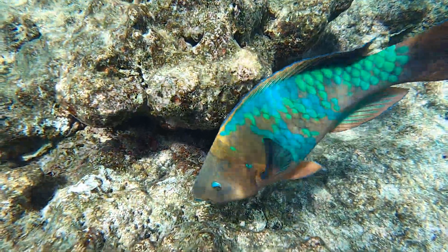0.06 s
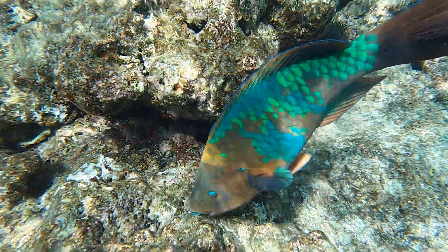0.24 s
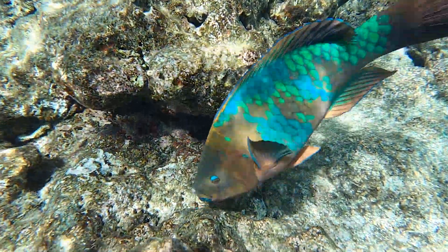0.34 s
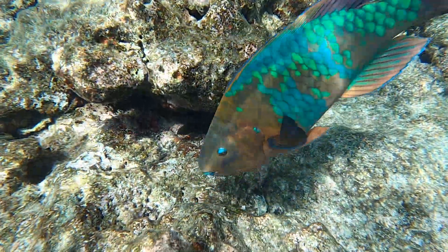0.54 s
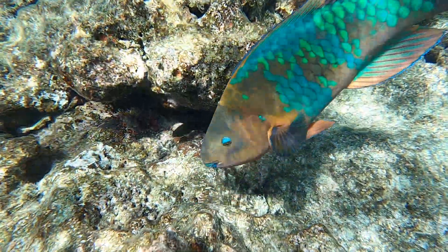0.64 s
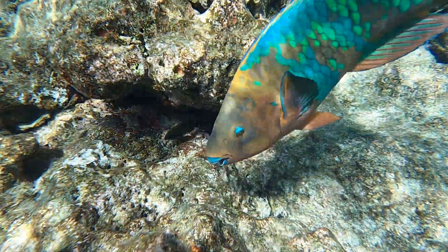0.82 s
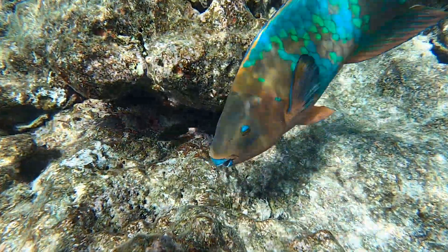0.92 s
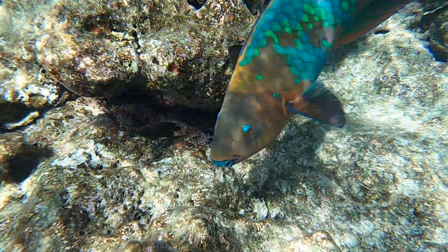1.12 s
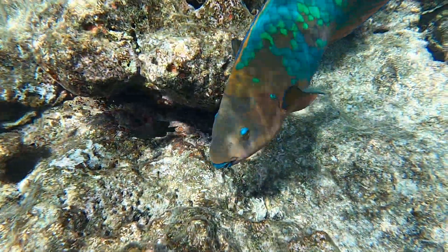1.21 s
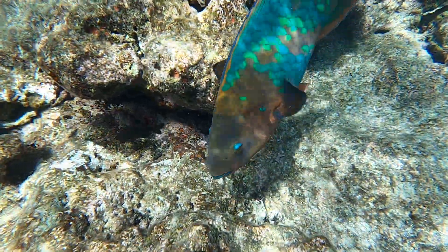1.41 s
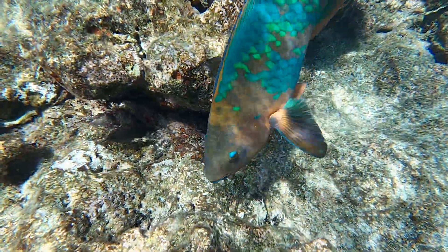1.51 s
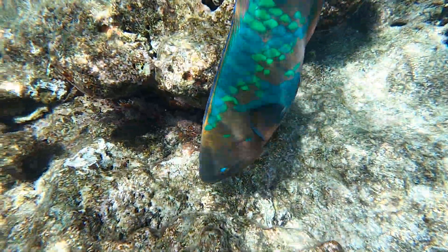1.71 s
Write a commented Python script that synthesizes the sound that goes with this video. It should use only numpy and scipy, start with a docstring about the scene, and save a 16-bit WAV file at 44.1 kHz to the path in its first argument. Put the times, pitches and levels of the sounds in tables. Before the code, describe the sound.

A fish bites rock with one sharp click amid underwater rumble, gurgles and crackling.

```python
"""Fish biting on a reef

Under water, a fish bites at algae on a rock: its beak gives a few faint rasps and one sharp click.
Flow rumbles past the housing and twice gurgles against it; small bubbles and two short knocks ring.
All around, the reef crackles with tiny snaps, filtered by the housing differently on each side."""
import sys
import numpy as np
from scipy import signal
from scipy.fft import rfft, irfft, next_fast_len
from scipy.io import wavfile
from scipy.ndimage import uniform_filter1d

SR = 44100
rng = np.random.default_rng(int(sys.argv[2]) if len(sys.argv) > 2 else 0)


def to_wav(s):
    """Save 16-bit WAV."""
    ch = np.atleast_2d(s).T  # columns
    pcm = np.round(np.clip(ch, -1, 1) * 32767)  # PCM
    wavfile.write(sys.argv[1], SR, pcm.astype(np.int16))


N = 77175
T = np.arange(N) / SR
TOP_HZ = 14300


def undb(db):
    return 10 ** (np.asarray(db) / 20)


def unit(x):
    return x / np.sqrt(np.mean(x ** 2) + 1e-18)


def pan(x, db):
    """Level difference between the channels: db is left minus right."""
    return x * undb(np.array([[db], [-db]]) / 2)


def smooth(x, seconds):
    """Two moving averages in series form a low-pass filter."""
    size = max(int(seconds * SR), 2)
    return uniform_filter1d(uniform_filter1d(x, size), size)


def even(x, seconds):
    """Division by the running RMS holds a texture at unit level."""
    return x / np.sqrt(np.abs(smooth(x ** 2, seconds)) + 1e-12)


def burst(x, size=176):
    """Energy normalisation: a transient gets the energy of 4 ms at unit level."""
    return x / np.sqrt(np.sum(x ** 2, axis=-1, keepdims=True) / size)


def colour(x, points, size=4096):
    """Minimum-phase filter through (f/Hz, gain/dB) points, falling 10 dB an octave above the last."""
    hz, db = np.array(points, float).T
    n = 2 * next_fast_len((x.shape[-1] + size) // 2)
    f = np.maximum(np.arange(n // 2 + 1) * SR / n, 1)
    gain_db = np.interp(np.log(f), np.log(hz), db) - 10 * np.log2(np.maximum(f / hz[-1], 1))
    cepstrum = irfft(np.log(undb(gain_db)))
    cepstrum[1:n // 2] *= 2
    cepstrum[n // 2 + 1:] = 0
    return irfft(rfft(x, n) * np.exp(rfft(cepstrum)))[..., :x.shape[-1]]


def peak(f, centre_hz, height_db, octaves):
    """Spectral peak in dB, Gaussian in log frequency."""
    return height_db * np.exp(-(np.log2(f / centre_hz) / octaves) ** 2 / 2)


def add(out, start_s, x):
    """Superpose x on out from a given time."""
    i = int(np.clip(start_s * SR, 0, N - 1))
    out[..., i:i + x.shape[-1]] += x[..., :N - i]


# Frequency response of the housing on each side: f/Hz, gain/dB
HOUSING_LEFT = [(300,-8.5),(850,-14),(1200,-5),(1400,-7),(1700,4.5),(2000,-9.5),(2450,-1.5),(4000,1),(5100,-2.5),(5900,-21.5),(7100,-8),(8400,-27),(12000,-32)]
HOUSING_RIGHT = [(300,4.5),(850,-15),(1200,-11.5),(1700,-1.5),(2000,-4.5),(2450,-14),(2700,4),(3100,-5),(4000,2.5),(4900,1.5),(8000,-30),(12500,-40.5)]
def housing(left, right):
    """Resonances of the housing filter the sound differently on each side."""
    return np.array([colour(left, HOUSING_LEFT), colour(right, HOUSING_RIGHT)])


# Envelopes of rumble and wash: t/s, relative level/dB
RUMBLE_LEVEL = [(0.0, -33), (0.452, -25.5), (0.485, -46.5), (0.544, -25.5), (0.57, -38.5), (0.652, -26),
                (0.809, -50.5), (0.843, -31.5), (0.93, -30), (1.257, -32.5), (1.286, -26), (1.408, -36),
                (1.7, -29), (1.75, -33)]
WASH_LEVEL = [(.12,-46.5),(.3,-55.5),(.95,-51),(1.15,-55),(1.45,-56.5),(1.75,-51)]
# Their spectra: f/Hz, relative density/dB
RUMBLE_SPECTRUM = [(12,-37.5),(24,-4),(33,2),(44,0),(58,-13.5),(85,-23),(200,-51.5)]
WASH_SPECTRUM = [(50,-10.5),(115,0),(190,-10),(340,-10.5),(560,-17.5),(780,-33),(1200,-26),(2500,-47)]
def flow(wander_db=2.5):
    """Slow pressure fluctuations of water on the housing make a rumble, over a soft wash."""
    rumble = even(colour(rng.standard_normal(N + SR), RUMBLE_SPECTRUM)[SR:], seconds=0.085)
    rumble *= undb(np.interp(T, *np.array(RUMBLE_LEVEL).T) + 1)
    common = unit(colour(rng.standard_normal(N), WASH_SPECTRUM))
    diffuse = undb(-15.5) * unit(colour(rng.standard_normal((2, N)), WASH_SPECTRUM))
    wander = unit(smooth(rng.standard_normal(N), seconds=0.049))
    wash_db = np.interp(T, *np.array(WASH_LEVEL).T) + wander_db * wander
    return pan(rumble, -3) + pan((common + diffuse) * undb(wash_db), 1.8)


def snap_envelope(t, decay_s, scatter_s=0.012):
    """Two exponential decays: the direct crack and its weaker scattering off the rocks."""
    return np.exp(-t / decay_s) + undb(-15.5) * np.exp(-t / scatter_s)


# Spectra of the distant patter and hiss: f/Hz, relative density/dB
PATTER_SPECTRUM = [(1150,-14.5),(1500,0.5),(5000,-1),(9000,3.5)]
HISS_SPECTRUM = [(1000,-14.5),(1600,-3.5),(5000,-6.5),(9000,-0.5)]
def far_snaps(count=190, low_hz=1620, high_hz=7380, spread_db=13.5, size=2048):
    """Incoherent summation: weak snaps, each with its own pitch and side, merge into hiss."""
    patter, f = np.zeros((2, N)), np.geomspace(500, TOP_HZ, 40)
    envelope = snap_envelope(T[:size], decay_s=0.0013)
    for when, pitch, strength, side in rng.random((count, 4)):
        hz = low_hz * (high_hz / low_hz) ** pitch
        spectrum = np.column_stack([f, peak(f, hz, height_db=12, octaves=0.35)])
        grit = rng.standard_normal(size) + rng.standard_normal((2, size))
        snap = burst(colour(grit * envelope, spectrum, size=size)) * undb(spread_db * strength)
        add(patter, when * N / SR, pan(snap, 8 * (2 * side - 1)))
    patter = unit(housing(*colour(patter, PATTER_SPECTRUM)))
    noise = rng.standard_normal(N) + 0.5 * rng.standard_normal((2, N))
    hiss = unit(housing(*colour(noise, HISS_SPECTRUM)))
    return patter * undb(-55.5) + hiss * undb(-59.5)


def clicks(per_s, spread_db):
    """A Poisson train of impulses with random size and sign."""
    chance, size = rng.random(N), np.clip(rng.standard_normal(N), -2, 2)
    return (chance < per_s / SR) * undb(spread_db * size) * rng.choice([-1, 1], N)


# Strokes of the beak: t/s, duration/s, level/dB
RASP_STROKES = [(0.018,0.027,-46),(0.092,0.0089,-49.5),(0.121,0.043,-45),(0.775,0.013,-38.5),(0.959,0.035,-47),(1.628,0.011,-39.5)]
# Their spectrum: f/Hz, relative density/dB
RASP_SPECTRUM = [(500,-6.5),(800,-13.5),(1020,-1.5),(1230,-11.5),(1470,6),(1750,-5.5),(2200,-18),(3100,-10),(5000,-33)]
def rasps():
    """Friction: the beak drags over the rock in short strokes, each a train of tiny impacts."""
    push = sum(undb(db) * np.sin(np.pi * np.clip((T - s) / length, 0, 1))
               for s, length, db in RASP_STROKES)
    grit = even(colour(clicks(per_s=1500, spread_db=0.68), RASP_SPECTRUM), seconds=0.0034)
    return pan(grit * push, 6.5)


def snap_band(spectrum, decay_s, size=2048):
    """Source and filter: one band of a snap is decaying noise passed through the housing."""
    noise = rng.choice([-1., 1.], size) * snap_envelope(T[:size], decay_s)
    band = colour(noise, spectrum)
    return burst(housing(band, band))


# Snaps: t/s, relative crack level/dB, peak f/Hz, body level/dB, crack left minus right/dB
NEAR_SNAPS = [(0.135,-40.5,3230,-48,5), (0.198,-48,3100,-54,4), (0.2256,-32,3300,-50.5,3),
              (.2492,-34.5,3740,-44.5,0), (0.2719,-35.5,2600,-47,3), (0.2884,-38.5,2600,-46,0),
              (0.2986,-33,3460,-52,1), (0.3527,-39.5,3400,-59,-1), (0.5608,-47.5,2780,-47,-3),
              (.641,-39,4100,-73,-4), (.6932,-40,3740,-42,6), (0.7085,-41,4330,-72,-1),
              (0.7304,-37,3760,-58,-1), (0.8276,-42,2730,-45.5,12), (0.8753,-37,3120,-40.5,6),
              (0.9507,-37.5,4000,-45.5,-3), (.9903,-36,3380,-46,2), (1.0934,-38.5,2900,-52,7),
              (1.1254,-41.5,2690,-45.5,-9), (1.148,-37.5,3000,-50.5,9), (1.18,-22.5,4600,-42,-3),
              (1.1882,-36,5130,-45,-11), (1.2311,-35,3900,-47.5,2), (1.3022,-35.5,2870,-52.5,6),
              (1.3412,-37.5,4420,-69,-9), (1.3531,-42,2670,-41.5,1), (1.421,-40,3000,-45,6),
              (1.4549,-31,3100,-35,-11), (1.476,-32,5040,-59,-7), (1.499,-34,3070,-56.5,3),
              (1.6413,-37,2630,-40,-7), (1.69,-36.5,3100,-46.5,-1), (1.7147,-30.5,4030,-52.5,0)]
# Spectra of a snap's three bands: f/Hz, relative density/dB
CRACK_SPECTRUM = [(1200,-35),(2500,1.5),(5300,4),(6500,-18.5)]
BODY_SPECTRUM = [(500,-11),(1000,-7.5),(2000,-2),(2600,-8)]
TOP_SPECTRUM = [(3500,-42),(6800,10.5),(12000,0),(14500,9.5)]
def near_snaps():
    """Broadband transients, probably shrimp: a pitched crack, a lower, longer body and a brief top."""
    out, f = np.zeros((2, N)), np.geomspace(1000, 7000, 60)
    base_db = np.interp(f, *np.array(CRACK_SPECTRUM).T)
    for s, crack_db, hz, body_db, side_db in NEAR_SNAPS:
        spectrum = np.column_stack([f, base_db + peak(f, hz, height_db=8.5, octaves=0.14)])
        crack = snap_band(spectrum, decay_s=0.0015) * undb(crack_db - 6.5)
        body = snap_band(BODY_SPECTRUM, decay_s=0.0058) * undb(body_db)
        top = snap_band(TOP_SPECTRUM, decay_s=0.0017) * undb(crack_db - 23.5 + rng.uniform(-7, 7))
        add(out, s, pan(crack, side_db) + pan(body, 5.5) + pan(top, 3))
    return out


# Bubbles, the gurgles' strongest glugs and two short ringing knocks:
# t/s, f/Hz, peak level/dB, rise/s, decay constant/s
BUBBLES_AND_KNOCKS = [(.185,300,-34,0.0018,0.0025),(.238,525,-47,0.0035,0.015),
                      (.372,300,-19,.0016,.004),(.401,590,-12,0.0022,0.0032),(.4055,420,-11.5,.0012,.0025),(.416,260,-18,.002,.004),(.4245,610,-11,0.0018,0.0022),(.429,127,-11.5,0.004,.012),(.4405,350,-17,.0012,.002),
                      (0.4915,496,-30.5,0.00068,0.0026),(.562,490,-41,0.0011,0.0027),(.766,282,-31.5,0.0016,0.0029),(.778,350,-26,0.0015,0.0017),(.778,997,-42,.0008,.004),
                      (.868,594,-32,0.0013,0.017),(0.8755,1730,-30,0.0012,0.003),(.8757,2030,-31,.001,.003),
                      (1.5475,620,-33,.0012,.002),(1.559,215,-25.5,.004,.014),(1.586,600,-30,.0012,.0022)]
def bubbles_and_knocks(glide_per_s=0.11, size=8192):
    """Damped oscillation: each bubble, glug or knock swells, rings and rises slightly in pitch."""
    out, t = np.zeros(N), T[:size]
    for s, hz, db, rise, decay in BUBBLES_AND_KNOCKS:
        envelope = (1 - np.exp(-(t / rise) ** 2)) * np.exp(-t / decay)
        tone = np.sin(2 * np.pi * hz * t * (1 + glide_per_s * t / 2))
        add(out, s, undb(db) * envelope / envelope.max() * tone)
    return pan(out, 2.5)


def churn(low_hz, high_hz, decay_cycles=2.03, size=2048):
    """Heavily damped resonance: a crowd of air pockets, each decaying in about two cycles."""
    out, t = np.zeros(N), T[:size]
    for when, pitch, strength in rng.random((N // 50, 3)):
        hz = low_hz * (high_hz / low_hz) ** pitch
        ring = np.sin(2 * np.pi * hz * t) * np.exp(-t * hz / decay_cycles)
        add(out, when * N / SR, strength ** 2 * np.sqrt(hz) * ring)
    return out


def swell(s, db, fade_s=0.003):
    """Amplitude envelope along a level curve, with Gaussian fades beyond its ends."""
    outside_s = T - np.clip(T, s[0], s[-1])
    return undb(np.interp(T, s, db)) * np.exp(-(outside_s / fade_s) ** 2)


# Envelopes, one table a gurgle: t/s, then relative level/dB of gulps, glugs and fizz
GURGLE_LEVELS = [
    [(.352,-46,-58,-72),(.374,-21,-27,-49),(.397,-22,-27,-44),(.407,-22,-19,-42),(.416,-20,-24,-45),(.427,-19,-21,-37),(.442,-17,-24,-45),(.449,-22,-42,-64),(.467,-40,-53,-72)],
    [(1.535,-46,-60,-68),(1.549,-34,-43,-55),(1.572,-27,-31,-43),(1.589,-25,-35,-49),(1.599,-34,-48,-62),(1.612,-46,-62,-70)],
]
# Spectra of the three layers: f/Hz, gain/dB
GULP_SPECTRUM = [(30,-17.5),(75,-6),(125,-2.5),(170,-6.5),(280,-5),(450,-43)]
GLUG_SPECTRUM = [(140,-32),(260,-0.5),(370,2.5),(590,-2),(720,-6),(850,-25),(1200,-51)]
FIZZ_SPECTRUM = [(550,-3.5),(780,2),(920,-1.5),(1060,3.5),(1250,-8.5),(1500,-3.5),(2200,-15.5),(3500,-10),(5000,-9.5),(6200,-24.5),(7300,-23),(9500,-42.5),(13500,-40)]
def gurgles(fizz_cutoffs_hz=(13000, 1880)):
    """Air pockets resonate as water slops on the housing: deep gulps, quicker glugs, a little fizz."""
    gulps = even(colour(churn(low_hz=81, high_hz=251), GULP_SPECTRUM), seconds=0.017) * undb(1)
    glugs = even(colour(churn(low_hz=263, high_hz=853), GLUG_SPECTRUM), seconds=0.0054)
    fizz = unit(colour(clicks(per_s=3000, spread_db=5.5), FIZZ_SPECTRUM)) * undb(4.5)
    out = np.zeros((2, N))
    for table, cutoff_hz in zip(GURGLE_LEVELS, fizz_cutoffs_hz):
        s, gulp_db, glug_db, fizz_db = np.array(table).T
        out += pan(gulps * swell(s, gulp_db), 0.97)
        out += pan(glugs * swell(s, glug_db), 2.0)
        out += pan(colour(fizz, [(1, 0), (cutoff_hz, 0)]) * swell(s, fizz_db), 5.4)
    return out


# Modes of the beak's click: f/Hz, relative level/dB, T60/s, left minus right/dB
BITE_MODES = [(1500,-19,0.02,3),(2640,-3,0.014,2),(3290,-8,0.014,-1),(3850,-2,0.006,4),(4400,0,0.006,3),(4800,-2,.006,-9),(5200,-5,0.007,-12),(7200,-9.5,0.007,6),(8700,-16,0.0051,5),(9600,-17,0.0046,4),(12200,-25,.005,10)]
def bite(start_s=0.4912, rise_s=0.0007, tail_s=0.0045, size=4096):
    """The impact of beak on rock excites damped modes; scattering adds a short tail."""
    out, ring, t = np.zeros((2, N)), np.zeros((2, size)), T[:size]
    for hz, db, t60, side_db in BITE_MODES:
        cycles = hz * t + rng.random((2, 1)) / 4
        ring += pan(np.sin(2 * np.pi * cycles) * undb(db - 60 * t / t60), side_db)
    ring *= 1 - np.exp(-(t / rise_s) ** 2)
    tail = housing(*(rng.standard_normal((2, size)) * np.exp(-t / tail_s)))
    click = burst(ring) + undb(-12.5) * burst(tail)
    add(out, start_s, pan(click * undb(-29), -0.5))
    return out


def scene():
    """Linear superposition of water, fish and reef."""
    return flow() + gurgles() + bubbles_and_knocks() + bite() + rasps() + near_snaps() + far_snaps()


def record(dry, lag_s=0.00007, lag_fade_hz=(5560, 7950)):
    """Phase delay makes the left channel lag, except in the treble; a low-pass filter cuts the top."""
    n = next_fast_len(N + SR // 2)
    f = np.arange(n // 2 + 1) * SR / n
    lag = lag_s * np.interp(f, lag_fade_hz, (1, 0))
    left = irfft(rfft(dry[0], n) * np.exp(-2j * np.pi * f * lag), n)[:N]
    lowpass = signal.ellip(8, 0.2, 70, TOP_HZ, fs=SR, output="sos")
    return signal.sosfilt(lowpass, np.array([left, dry[1]]))


dry = scene()
out = record(dry)
to_wav(out)
```